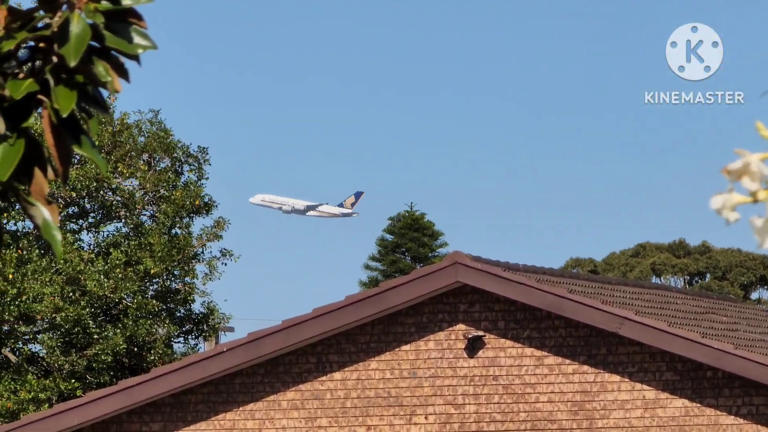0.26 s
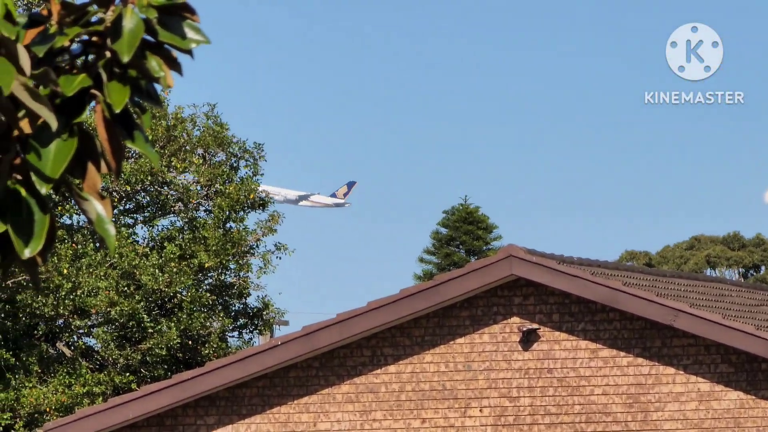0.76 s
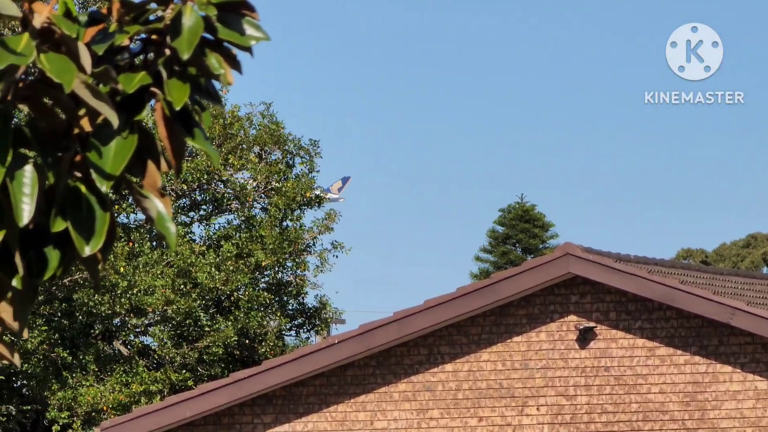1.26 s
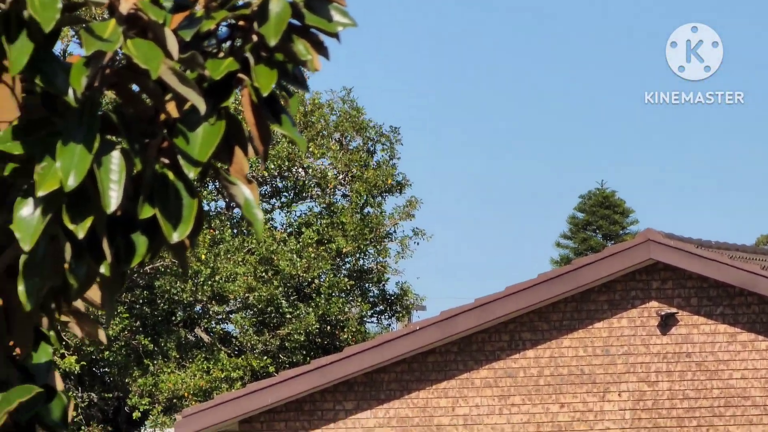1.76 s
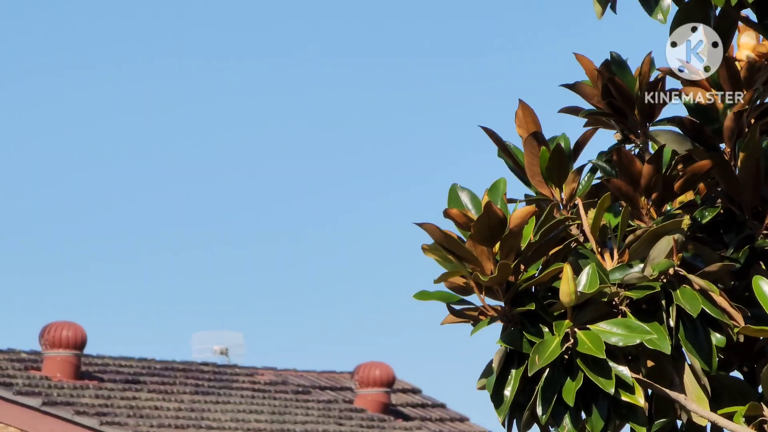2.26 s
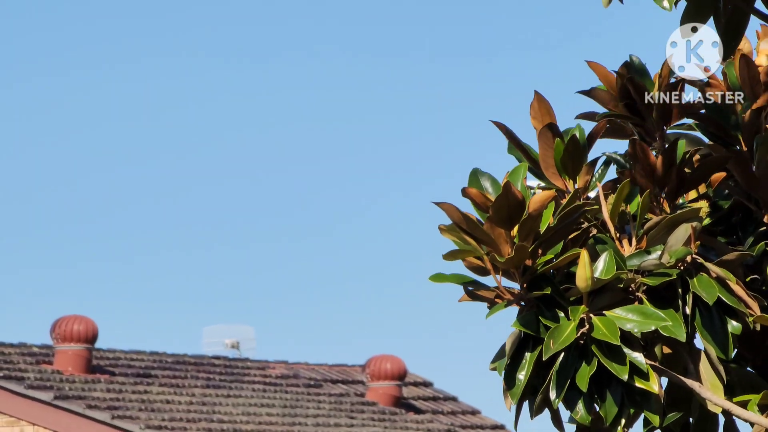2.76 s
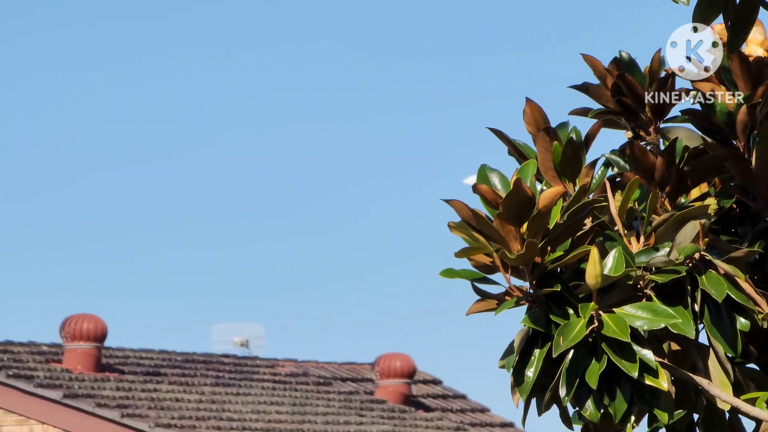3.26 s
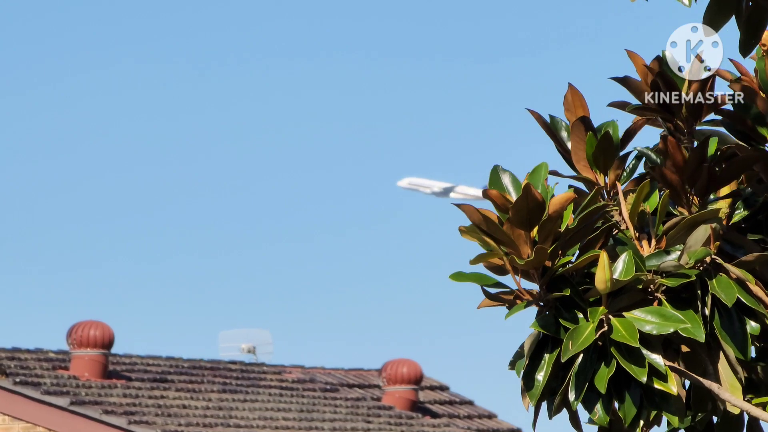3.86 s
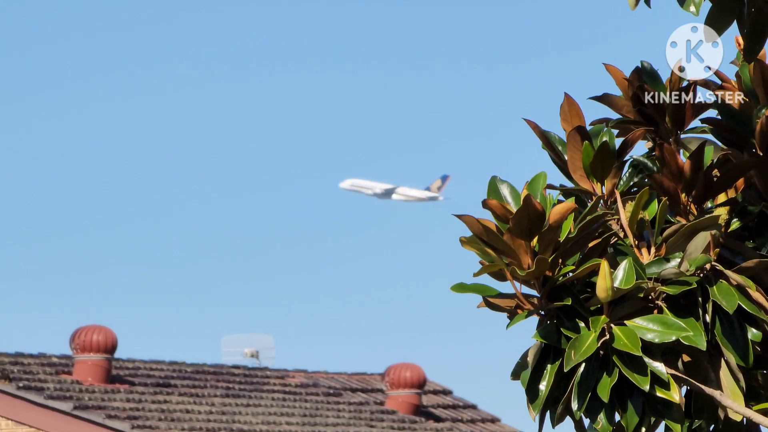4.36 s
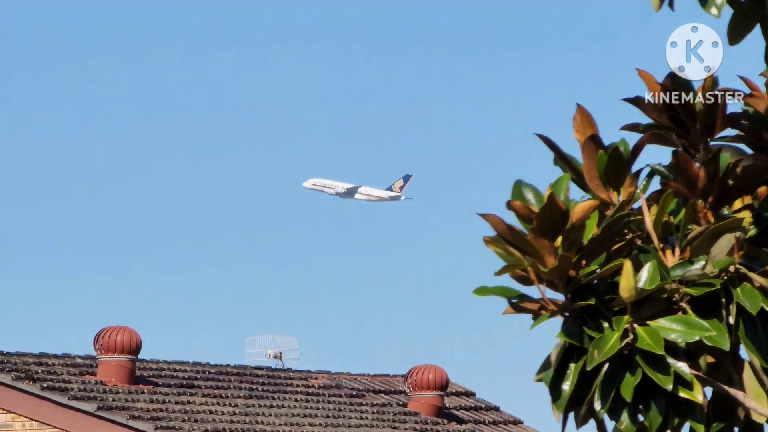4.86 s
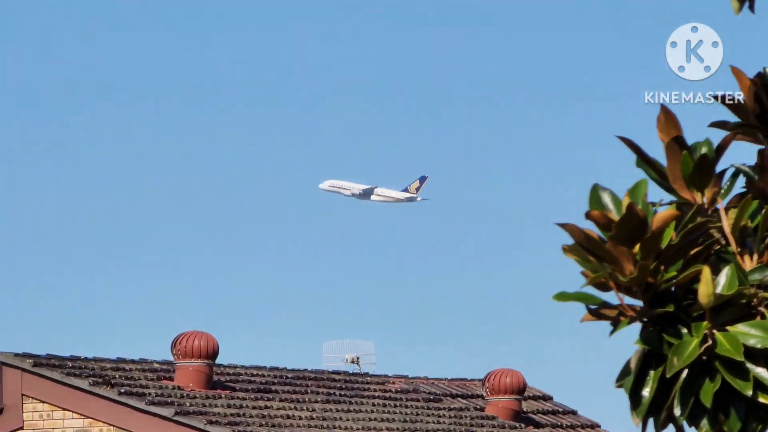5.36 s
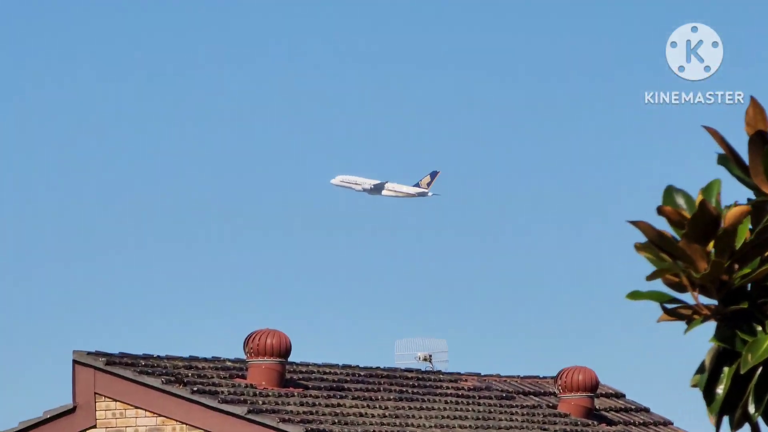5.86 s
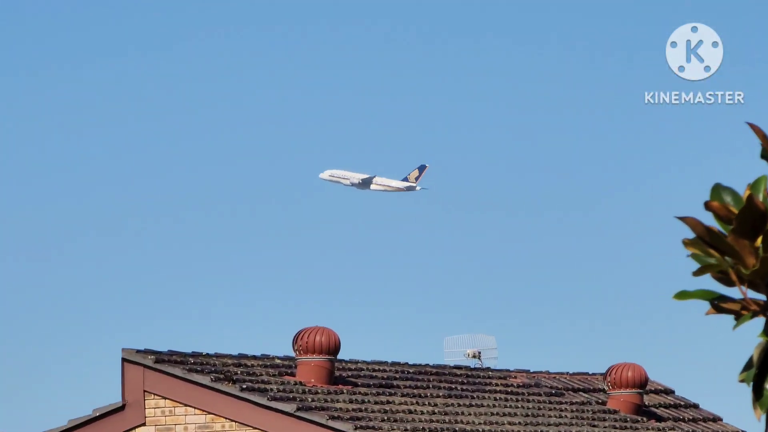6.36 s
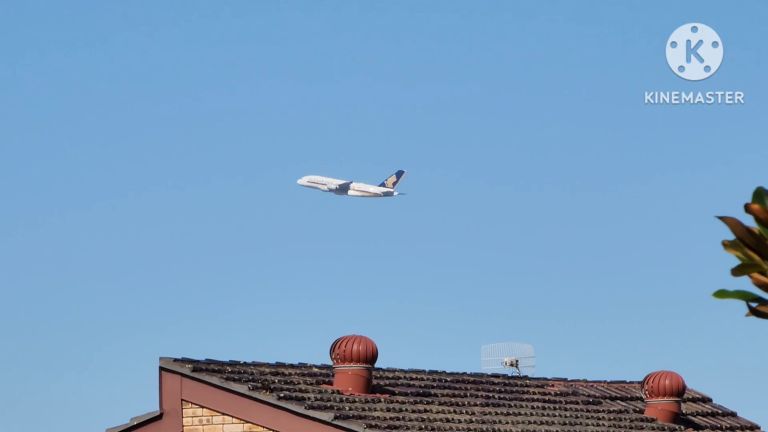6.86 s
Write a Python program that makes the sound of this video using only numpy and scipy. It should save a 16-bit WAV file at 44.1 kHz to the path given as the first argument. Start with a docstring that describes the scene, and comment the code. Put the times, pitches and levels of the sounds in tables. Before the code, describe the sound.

Outdoors in a quiet suburban garden, a four-engine airliner climbs out at a distance, with lumpy low rumble, droning fans and swelling roar. Leaves rustle close to the microphone early on, and a tiny click comes near two seconds. Then a small bird starts faintly, growing into sliding whistles, buzzy rasps, cries and chips, echoing lightly off the houses while the jet continues.

```python
"""Jet over a suburb, with a songbird

A four-engine jet climbs out: shaped noise rumbles and roars in swells, three wavering sines drone for its fans.
Shaped noise also makes the suburb's hush and the rustling leaves; a throbbing narrow buzz is an insect.
One tiny click, then a bird: trilled sines whistle, slide, warble, rasp, cry and chip, with echoes off the houses."""
import sys
import numpy as np
from scipy import signal
from scipy.fft import rfft, irfft, next_fast_len
from scipy.io import wavfile
from scipy.ndimage import uniform_filter1d

SR = 44100
rng = np.random.default_rng(int(sys.argv[2]) if len(sys.argv) > 2 else 0)


def pcm_store(signal):
    """Save signal as 16-bit PCM."""
    levels = np.round(np.clip(np.atleast_2d(signal), -1, 1) * 32767)
    wavfile.write(sys.argv[1], SR, levels.astype(np.int16).T)


N = 313551
TIME = np.arange(N) / SR
LUMPS_PER_S = 8


def gain_of(db):
    """Decibels to amplitude gain."""
    return 10 ** (np.asarray(db) / 20)


def evened(x):
    """Scales to an rms of 1."""
    return x / np.sqrt(np.mean(x ** 2) + 1e-20)


def read(points, hz):
    """Interpolates a table of (hz, value) on a log-frequency axis."""
    point_hz, value = np.transpose(points)
    return np.interp(np.log(hz + 1), np.log(point_hz + 1), value)


def curves(rows):
    """Every column of a time table, interpolated at each sample."""
    row_s, *columns = np.transpose(rows)
    return [np.interp(TIME, row_s, column) for column in columns]


def add(mix, start_s, sound):
    """Mixes a sound in at start_s, cut at the end of the mix."""
    part = mix[round(start_s * SR):][:len(sound)]
    part += sound[:len(part)]


def drift(per_s):
    """Random signal of rms 1: white noise under a Gaussian low-pass, moving up to about per_s times a second."""
    size = next_fast_len(N)
    hz = np.fft.rfftfreq(size, 1 / SR)
    spectrum = rfft(rng.standard_normal(size)) * np.exp(-(hz / per_s) ** 2)
    return evened(irfft(spectrum, size)[:N])


def noise(shape, patchy_db, size=2048):
    """Stereo noise of a given spectrum with random time-frequency patches; the mean of the ears has rms 1."""
    # left-right correlation of diffuse noise: hz, likeness (-1 to 1)
    likeness = [(20, -0.13), (60, 0.41), (130, 0.82), (290, 0.9), (640, 0.29), (1400, -0.27),
                (3000, -0.026)]
    hop = size // 4
    hz = np.fft.rfftfreq(size, 1 / SR)
    a, b, c, d, patches = rng.standard_normal((N // hop + 5, len(hz), 5)).T
    patches = uniform_filter1d(patches, size=7, axis=0)
    patches = evened(uniform_filter1d(patches, size=7, axis=1))
    same = np.clip(read(likeness, hz), -1, 1)[:, None]
    left = a + 1j * b
    right = same * left + np.sqrt(1 - same ** 2) * (c + 1j * d)
    z = np.array([left, right]) * gain_of(read(shape, hz)[:, None] + patchy_db * patches)
    x = signal.istft(z, nperseg=size, noverlap=size - hop)[1][:, :N]
    return x / np.std(x.mean(0))


def steadied(x, size=8000):
    """Takes the slow swells out of a noise, so that a level curve can lead it."""
    return x / np.sqrt(uniform_filter1d(x.mean(0) ** 2, size) + 1e-9)


def surging(level_db, lumpy_db=1.0):
    """Gain of the deep rumble: small random lumps, plus bell-shaped surges added as power."""
    # surges of the deep rumble, ahead of the rumble trim: peak_s, peak_db, half_width_s (to 1/e of power)
    surges = [(.47, -28.5, 0.029), (1.48, -22.5, 0.028), (1.678, -13, 0.019), (1.84, -19, 0.069),
              (2.14, -20, 0.021), (2.27, -22.5, 0.037), (2.52, -25, 0.018), (2.77, -16, 0.014),
              (2.91, -15, 0.025), (3.22, -23, 0.017), (3.305, -24, 0.016), (3.475, -23.5, 0.017),
              (3.61, -20, .02), (3.835, -25, .018), (4.06, -21, 0.019), (4.155, -19.5, 0.023),
              (4.43, -25, 0.013), (4.659, -17, 0.018), (5.391, -18, 0.013), (5.811, -22, 0.03)]
    power = gain_of(level_db + lumpy_db * drift(LUMPS_PER_S)) ** 2
    for peak_s, peak_db, half_width_s in surges:
        power = power + gain_of(peak_db) ** 2 * np.exp(-((TIME - peak_s) / half_width_s) ** 2)
    return np.sqrt(power)


def exhaust(rumble_trim_db=1.05, roar_trim_db=-2, upper_trim_db=0.0, crest_db=-29, swell_db=-22,
            brightening=2.23, billow_db=1.6):
    """Large eddies rumble, smaller ones roar; the air on the way makes each swell, and the roar brightens with it."""
    # jet noise levels ahead of the trims: time_s, rumble_db, roar_db, upper_roar_db
    jet = [(0, -32.5, -39.5, -53), (.3, -38, -37.5, -49), (.44, -27.5, -30.5, -50), (.7, -31, -34.5, -49),
           (1.2, -42, -38, -47), (1.66, -18.5, -34.5, -46.5), (1.92, -50, -23, -38), (2.02, -42, -23, -42),
           (2.17, -29.5, -22, -39.5), (2.75, -30.5, -23.5, -37.5), (3.15, -30.5, -26.5, -40.5),
           (3.9, -34, -31.5, -46), (4.12, -30, -27, -43.5), (4.45, -25.5, -31, -45),
           (5.2, -33.5, -31, -44.5), (5.8, -34.5, -32.5, -43), (7.11, -31.5, -31.5, -42)]
    # spectrum of the deep rumble: hz, relative_db_per_hz
    rumble_shape = [(12, -48), (24, -13.5), (38, 0.5), (55, 0.5), (75, 2), (95, 0.5), (130, -29),
                    (250, -84)]
    # spectrum of the roar: hz, relative_db_per_hz
    roar_shape = [(50, -33), (85, -9.5), (115, 4), (160, 2.5), (195, -0.5), (250, -7), (330, -18),
                  (520, -61.5)]
    # spectrum of the extra roar in the swells: hz, relative_db_per_hz
    crest_shape = [(110, -11), (155, 1), (190, 6.5), (240, -31.5), (340, -21), (420, -15), (700, -50.5)]
    # spectrum of the upper roar: hz, relative_db_per_hz
    upper_shape = [(170, -21.5), (290, -0.5), (390, -3.5), (500, -8.5), (700, -14), (1000, -20),
                   (1600, -39.5), (4000, -82)]
    rumble_db, roar_db, upper_db = curves(jet)
    billow = drift(LUMPS_PER_S)
    # crest_db holds where the roar curve stands at swell_db; brightening is dB of crest per dB of roar
    crest_level_db = crest_db + brightening * np.minimum(roar_db - swell_db, 2)
    roar_level_db = roar_db + roar_trim_db + billow_db * billow
    upper_level_db = upper_db + upper_trim_db + billow_db * billow / 2

    rumble_gain = gain_of(rumble_trim_db) * surging(rumble_db)
    rumble = rumble_gain * steadied(noise(rumble_shape, patchy_db=-4.5, size=4096))
    roar = gain_of(roar_level_db) * steadied(noise(roar_shape, patchy_db=1.5))
    crest = gain_of(crest_level_db) * steadied(noise(crest_shape, patchy_db=3.0))
    upper = gain_of(upper_level_db) * noise(upper_shape, patchy_db=3.0)
    return rumble + roar + crest + upper


def fans(waver_db=2.3, wander_rad=0.19, ear_spread_rad=0.25):
    """Three orders of the fan shafts drone and sink slowly as the jet passes; turbulence makes them waver."""
    # shaft speed as heard, lowered by the Doppler shift: time_s, shaft_hz
    shaft = [(0, 48.5), (1.3, 47.89), (2.2, 46.41), (4.2, 46.29), (7.11, 45.74)]
    # drone fading in and out on its way through the air: time_s, second_order_db, third_order_db
    drone = [(0, -49, -43.5), (.26, -38, -35.5), (.37, -25, -33.5), (.9, -26, -49), (1.2, -32.5, -53),
             (1.42, -26, -44), (1.8, -80, -44), (2.15, -26, -21), (2.65, -25, -36.5), (3.3, -28, -28.5),
             (4.2, -37, -32.5), (5.05, -46, -47), (5.4, -31.5, -38.5), (6.2, -29.5, -30), (6.6, -27.5, -29),
             (7.11, -31, -32)]
    shaft_hz, = curves(shaft)
    second_db, third_db = curves(drone)
    sixth_db = -57 + 1.56 * TIME  # grows as the jet turns its tail
    out = np.zeros((2, N))
    for order, db in ((2, second_db), (3, third_db), (6, sixth_db)):
        angle = 2 * np.pi * np.cumsum(order * shaft_hz) / SR + wander_rad * drift(8.1)
        level = np.sqrt(2) * gain_of(db + waver_db * drift(13.0))  # sqrt(2): rms to peak
        for ear in out:
            ear += level * np.sin(angle + ear_spread_rad * drift(20.0))
    return out


def suburb(level_db=-53):
    """Steady shaped noise: the quiet hush of the suburb."""
    # spectrum of the hush: hz, relative_db_per_hz
    hush_shape = [(200, -23.5), (500, 4), (900, 3), (1400, 5), (2200, -2), (3500, -8), (5500, -20.5),
                  (9500, -27.5), (11500, -54), (16000, -44)]
    return gain_of(level_db) * noise(hush_shape, patchy_db=3.0, size=1024)


def foliage(flicker_db=2.0, grain_db=0.0, width_octaves=1.2):
    """A soft hiss of leaves follows the breeze; short strokes of shaped noise are nearby rustles."""
    # hiss level in the breeze: time_s, treble_db
    breeze = [(0, -60), (.6, -67.5), (1.15, -66), (1.4, -57), (2.9, -57.5), (4.6, -60.5), (5.8, -67.5),
              (6.9, -63.5), (7.11, -43.5)]
    # spectrum of the leaf hiss: hz, relative_db_per_hz
    leaf_shape = [(500, -13), (1500, 13.5), (3000, 7), (5000, 3.5), (6800, -1), (7400, 2.5), (8200, -2.5),
                  (9700, 0.5), (11500, -11.5), (15500, -9)]
    # spectrum of a rustle ahead of its own colour: hz, relative_db_per_hz
    twig_shape = [(600, -3), (1300, 11.5), (6000, 0), (11000, -6.5), (15500, -9)]
    # brief rustles close by: peak_s, level_db, rise_s, decay_s, centre_hz
    rustles = [(0.157, -34.5, 0.0017, 0.015, 2400), (0.926, -39.5, 0.011, 0.029, 4610),
               (1.045, -46, 0.014, 0.056, 3500), (1.30, -55, 0.058, 0.061, 5000),
               (1.435, -49, 0.014, 0.012, 8000), (1.534, -45.5, 0.0055, 0.011, 7000),
               (1.72, -50, 0.014, 0.014, 6000), (2.655, -43, 0.05, 0.059, 2200)]
    breeze_db, = curves(breeze)
    out = gain_of(breeze_db + flicker_db * drift(16)) * noise(leaf_shape, patchy_db=-2.0, size=512)
    grains = gain_of(grain_db * drift(180)) * noise(twig_shape, patchy_db=4.5, size=256)
    size = next_fast_len(N)
    hz, spectrum = np.fft.rfftfreq(size, 1 / SR), rfft(grains, size)
    for peak_s, db, rise_s, decay_s, centre_hz in rustles:
        octaves = np.log2((hz + 1) / centre_hz)
        colour = 1 / np.sqrt(1 + (octaves / width_octaves) ** 2)
        stroke = np.exp(-np.maximum((peak_s - TIME) / rise_s, (TIME - peak_s) / decay_s))
        out += gain_of(db) * stroke * evened(irfft(spectrum * colour, size)[:, :N])
    return out


def insect(start_db=-71, pitch_hz=7400, width_hz=170, throbs_per_s=4.6, fade_db_per_s=5.0):
    """A sine with random amplitude and phase makes a faint narrow buzz that throbs and slowly fades."""
    buzz = np.array([drift(width_hz) * np.sin(2 * np.pi * pitch_hz * TIME + drift(width_hz))
                     for ear in range(2)])
    throb = abs(np.sin(np.pi * throbs_per_s * TIME))
    return gain_of(start_db - fade_db_per_s * TIME) * evened(buzz * throb)


def click(start_s=1.9095, peak_db=-19, decay_s=.00005):
    """One tiny dry click: an abrupt edge with an exponential decay, alike in both ears."""
    out = np.zeros(N)
    add(out, start_s, gain_of(peak_db) * np.exp(-TIME[:200] / decay_s))
    return out


def glide(start_hz, end_hz, arch=1):
    """Start, middle and end pitch of a glide; an arch above 1 lifts its middle."""
    return start_hz, arch * (start_hz + end_hz) / 2, end_hz


def song():
    """Syllables as (start_s, length_s, start_hz, mid_hz, end_hz, level_db, kind); pitches ahead of trill and droop."""
    # faint thin whistles in two rising steps: start_s, length_s, start_hz, end_hz, level_db
    whistles = [(2.178, 0.11, 4370, 4400, -58.5), (2.262, 0.048, 4660, 4800, -55)]
    # two-voice warbles, high voice first: start_s, length_s, high_db, low_db, low_top_hz
    warbles = [(3.332, 0.083, -49, -38.5, 3010), (5.143, 0.084, -49, -44, 2820),
               (5.627, 0.051, -56, -46, 2810)]
    # rasps led in by two falling slurs:
    # start_s, length_s, start_hz, end_hz, level_db, lower_slur_db, upper_slur_db
    rasps = [(4.033, 0.076, 2350, 2383, -36, -47, -56), (4.248, 0.077, 2470, 2448, -34.5, -44, -63),
             (4.475, 0.078, 2417, 2442, -32.5, -47, -60), (4.705, 0.079, 2392, 2412, -35.5, -47, -63),
             (4.948, 0.0804, 2329, 2340, -34.5, -48, -59), (6.880, 0.09, 2332, 2614, -43, -49.5, -72)]
    # murmur, pip, and a cry over a trilling lower voice:
    # pip_s, pip_length_s, pip_start_hz, pip_end_hz, pip_db,
    # cry_s, cry_length_s, cry_start_hz, cry_end_hz, cry_db, under_top_hz, under_db
    phrases = [(3.669, 0.041, 2880, 1880, -34.5, 3.771, 0.083, 3440, 3010, -37.5, 3156, -35),
               (6.045, 0.025, 2306, 2195, -35.5, 6.130, 0.0796, 3190, 3006, -44, 2870, -44),
               (6.53, 0.021, 2250, 2295, -37.5, 6.612, 0.074, 3136, 3100, -38.5, 2890, -44)]
    # sharp high chips: start_s, level_db, top_hz
    chips = [(5.224, -45, 5950), (5.408, -46, 6030), (5.537, -48, 5980)]

    for s, length_s, start_hz, end_hz, db in whistles:
        yield s, length_s, *glide(start_hz, end_hz), db, "pip"

    slide_s, lead_s = 3.119, 0.045  # a soft note leads into the slide
    yield slide_s - lead_s, lead_s, *glide(1830, 1830), -53, "soft"
    yield slide_s, 0.185, *glide(1960, 2535, arch=1.025), -41, "slide"

    high_hz, low_lag_s, low_shorter_s = 4270, 0.023, 0.009
    for s, length_s, high_db, low_db, low_hz in warbles:
        yield s, length_s, *glide(high_hz, high_hz), high_db, "high"
        yield s + low_lag_s, length_s - low_shorter_s, *glide(low_hz, low_hz), low_db, "low"

    slur_s, slur_from_hz, slur_to_hz = 0.052, 2450, 2050
    upper_ratio = 1.33  # upper slur pitch over lower
    for s, length_s, start_hz, end_hz, db, slur_db, upper_db in rasps:
        yield s - slur_s, slur_s, *glide(slur_from_hz, slur_to_hz), slur_db, "soft"
        upper_slur = glide(upper_ratio * slur_from_hz, upper_ratio * slur_to_hz)
        yield s - slur_s, slur_s, *upper_slur, upper_db, "soft"
        yield s, length_s, *glide(start_hz, end_hz, arch=1.04), db, "rasp"

    murmur_lead_s, murmur_s, murmur_db = .095, 0.08, -49.5
    drop_s, drop_db = .03, -8  # a cry ends in a short falling note; level against the cry
    for (pip_s, pip_length_s, pip_start_hz, pip_end_hz, pip_db,
         cry_s, cry_length_s, cry_start_hz, cry_end_hz, cry_db, under_hz, under_db) in phrases:
        murmur_hz = 1.02 * pip_start_hz
        yield pip_s - murmur_lead_s, murmur_s, *glide(murmur_hz, murmur_hz), murmur_db, "soft"
        yield pip_s, pip_length_s, *glide(pip_start_hz, pip_end_hz), pip_db, "pip"
        yield cry_s, cry_length_s, *glide(cry_start_hz, cry_end_hz), cry_db, "cry"
        yield cry_s, cry_length_s, *glide(under_hz, under_hz), under_db, "under"
        drop = glide(0.97 * under_hz, .86 * under_hz)
        yield cry_s + cry_length_s - drop_s / 4, drop_s, *drop, cry_db + drop_db, "soft"

    for s, db, top_hz in chips:
        yield s, 0.043, *glide(top_hz, top_hz), db, "chip"


def chip_edge(x, edge_hz=4700):
    """The throat lets little of a chip through below its resonance: a steep high-pass."""
    return signal.sosfilt(signal.butter(10, edge_hz, "high", fs=SR, output="sos"), x)


def walls(x, near_db=-2, count=8, reach_s=.013):
    """Ground, eaves and walls add quick copies, drawn anew for each syllable as the bird turns its head."""
    response = np.zeros((2, 2000))
    at = (reach_s * SR * rng.uniform(.08, 1, (2, count))).astype(int)
    size = gain_of(near_db) * rng.choice([-1., 1.], at.shape) / np.sqrt(count)
    # those from straight ahead reach both ears alike
    at[1, ::2] = at[0, ::2]
    size[1, ::2] = size[0, ::2]
    np.put_along_axis(response, at, size, 1)
    response[:, 0] = 1
    return signal.fftconvolve(x[None], response, axes=1)


def bird(jitter=0.052, flutter=0.17, edge=0.17, depth_spread=0.1, uneven=.1, throat_hz=1750):
    """Each syllable is a whistle on an arched pitch, swung down and up by a fast trill; some droop at the end."""
    # pitch motion by kind: trills_per_s, depth (share of pitch), dip_narrowness (exponent), end_droop (share)
    trill_table = {"slide": (41, .06, 1.5, .02), "high": (35, .14, 1.3, 0), "low": (36, .33, 1.5, 0),
                   "rasp": (71, .19, 1, 0), "soft": (58, .06, 1, 0), "cry": (55, .025, 1, .02),
                   "under": (55, .27, 1.2, 0), "pip": (33, .015, 1, 0), "chip": (190, .155, .6, 0)}
    # tone by kind: dip_db (level change in a dip), growth_db (over the length),
    # second_harmonic_db, third_harmonic_db, roughness (factor), left_minus_right_db
    tone_table = {"slide": (-11, -6, -34, -43, 0.03, 0), "high": (9.5, -8, -27, -41, 0.44, .5),
                  "low": (-1, 9, -28, -35, 0.07, 2), "rasp": (0.5, 2, -28.5, -30.5, .5, 0),
                  "soft": (0, 1.5, -32, -46, 1.2, 0.5), "cry": (-1, 5.5, -11.5, -23.5, 0.33, -1.5),
                  "under": (4, 4.5, -23.5, -23, 0.54, 2), "pip": (1.5, -0.5, -36.5, -60, 0.43, -0.5),
                  "chip": (4, -6, -14, -23, 1, -5.5)}
    out = np.zeros((2, N))
    unrest, shake, stumble, reach = drift(890), drift(400), drift(48.9), drift(66.6)
    for s, length_s, start_hz, mid_hz, end_hz, db, kind in song():
        trills_per_s, depth, narrow, droop = trill_table[kind]
        dip_db, growth_db, second_db, third_db, rough, pan_db = tone_table[kind]
        t = np.arange(int(length_s * SR)) / SR
        done = t / length_s
        here = slice(round(s * SR), round(s * SR) + len(t))

        arch = np.polyfit([0, .5, 1], [start_hz, mid_hz, end_hz], 2)
        arch_hz = np.polyval(arch, done) * (1 - droop * done ** 8)
        dips = (np.cos(np.pi * (trills_per_s * t + uneven * stumble[here])) ** 2) ** narrow
        trilled_hz = arch_hz * (1 - depth * dips * (1 + depth_spread * reach[here]))
        hz = trilled_hz * (1 + jitter * rough * unrest[here])
        angle = 2 * np.pi * np.cumsum(hz) / SR

        # overtones halve at the bottom of a dip
        overtones = gain_of(second_db) * np.sin(2 * angle) + gain_of(third_db) * np.sin(3 * angle)
        voice = np.sin(angle) + (1 - dips / 2) * overtones
        voice = voice * gain_of(dip_db * dips + growth_db * done)
        note = voice * signal.windows.tukey(len(t), edge) * (1 + rough * flutter * shake[here])
        if kind == "chip":
            note = chip_edge(note)

        sound = walls(note) * gain_of([[pan_db / 2], [-pan_db / 2]])
        # level_db is the rms over the note's length
        sound *= gain_of(db) * np.sqrt(len(t)) / np.linalg.norm(sound.mean(0))
        for ear, part in zip(out, sound):
            add(ear, s, part)
    return signal.sosfilt(signal.butter(8, throat_hz, "high", fs=SR, output="sos"), out)


def yard(x, tail_db=-12, close_db=-9.0):
    """Direct sound, a short scatter from the garden, and a thin tail from the houses around."""
    # decay of the echoes between the houses: hz, t60_s
    house_decay = [(1500, 2.3), (3000, 1.07), (5500, 0.59), (12000, 0.3)]
    taps = np.zeros((2, SR))
    # one tap of random size in every 20 samples, from 600 samples on
    at = np.arange(600, SR - 20, 20) + rng.integers(0, 20, (2, (SR - 601) // 20))
    np.put_along_axis(taps, at, rng.standard_normal(at.shape) ** 3, 1)
    hz, t, z = signal.stft(taps, SR, nperseg=256)
    z = z * gain_of(-60 * t / read(house_decay, hz)[:, None])
    tail = signal.istft(z, SR, nperseg=256)[1][:, :SR]
    close = rng.standard_normal((2, SR)) * (taps != 0) * gain_of(-60 * TIME[:SR] / .2)  # t60 0.2 s
    response = gain_of(close_db) * close / np.linalg.norm(close[0])
    response += gain_of(tail_db) * tail / np.linalg.norm(tail[0])
    response[:, 0] += 1
    return signal.fftconvolve(x, response, axes=1)[:, :N]


def scene():
    """The jet over the quiet suburb, with the bird in front."""
    return exhaust() + fans() + suburb() + foliage() + insect() + click() + yard(bird())


def record(dry, edge_hz=15600):
    """Band limit: a linear-phase low-pass at edge_hz."""
    lowpass = signal.firwin(511, edge_hz, window=("kaiser", 9), fs=SR)
    return signal.oaconvolve(dry, lowpass[None], "same")


dry = scene()
out = record(dry)
pcm_store(out)
```